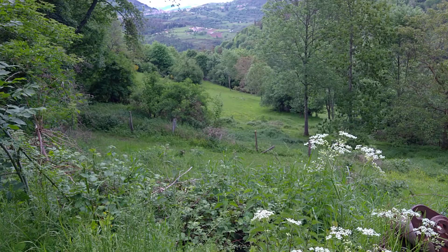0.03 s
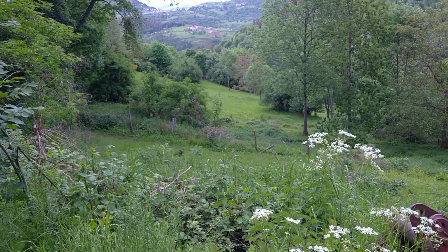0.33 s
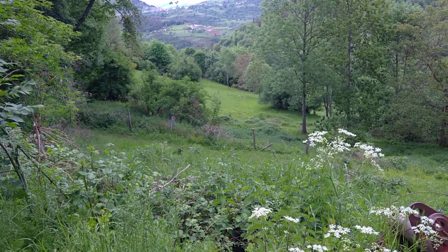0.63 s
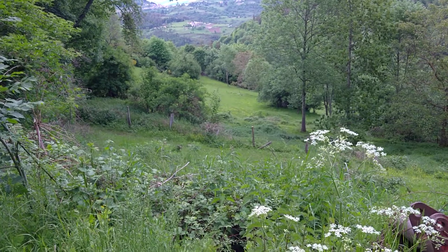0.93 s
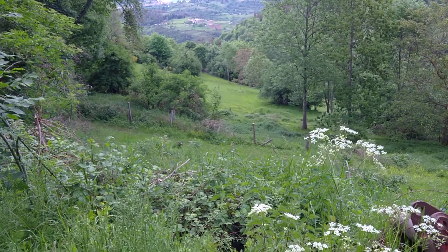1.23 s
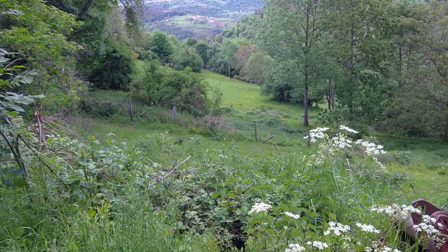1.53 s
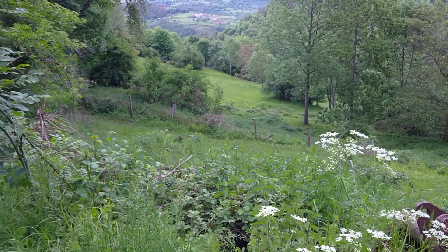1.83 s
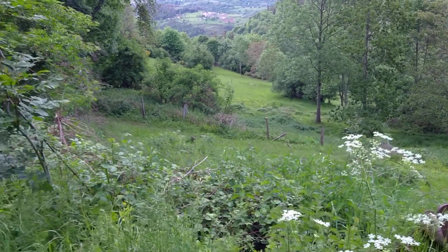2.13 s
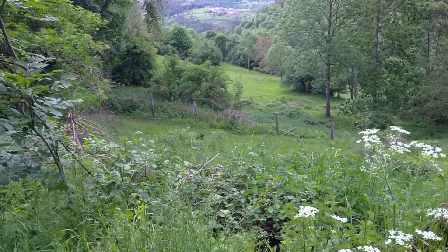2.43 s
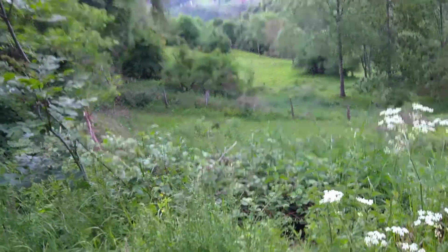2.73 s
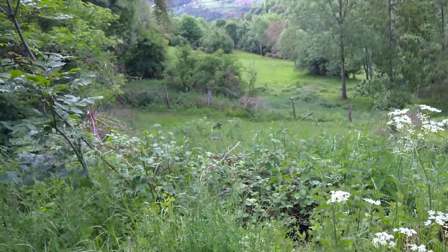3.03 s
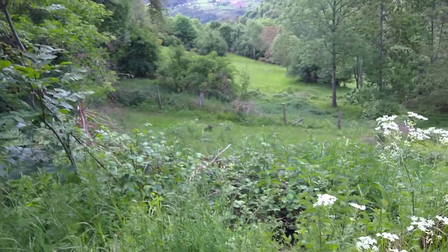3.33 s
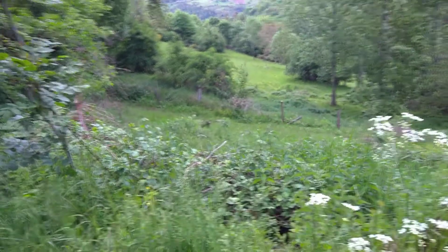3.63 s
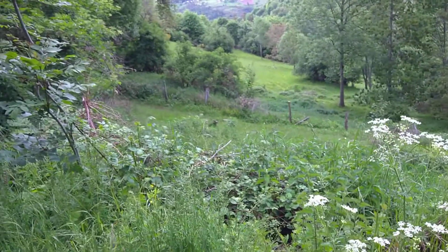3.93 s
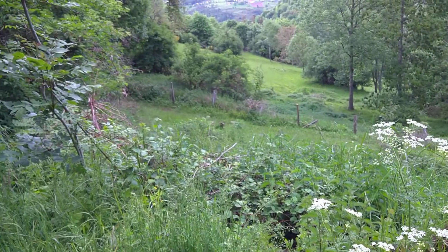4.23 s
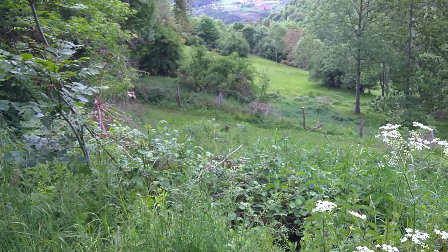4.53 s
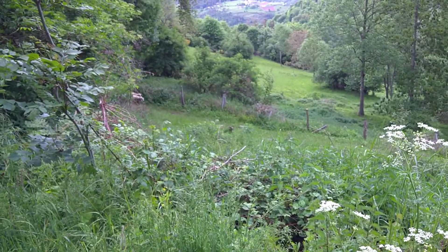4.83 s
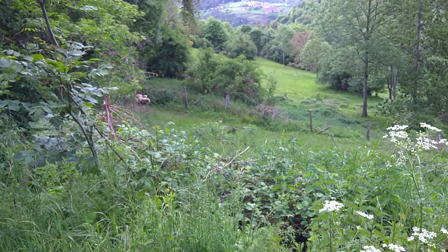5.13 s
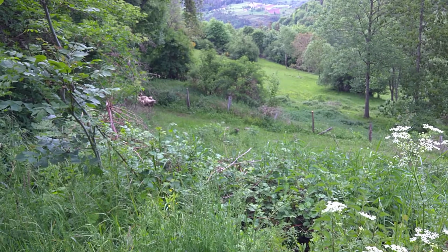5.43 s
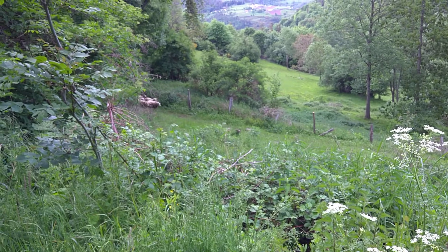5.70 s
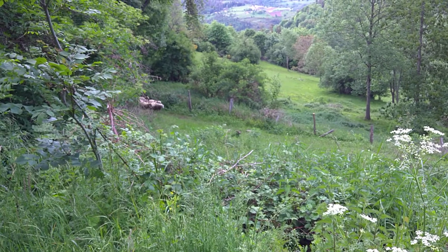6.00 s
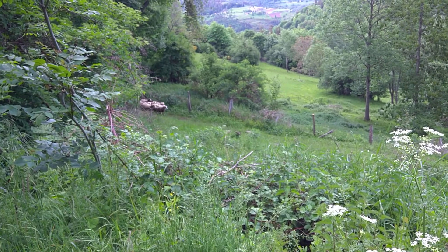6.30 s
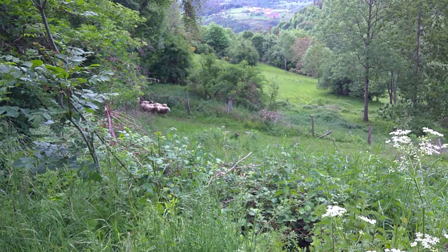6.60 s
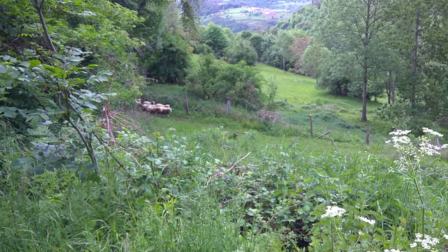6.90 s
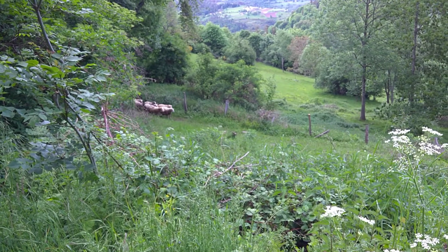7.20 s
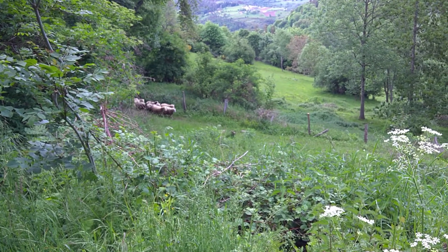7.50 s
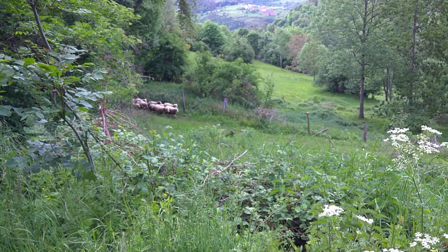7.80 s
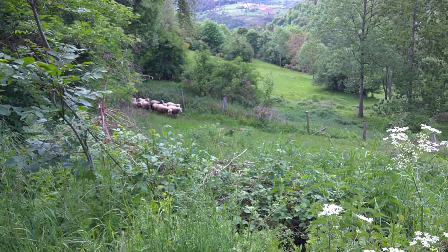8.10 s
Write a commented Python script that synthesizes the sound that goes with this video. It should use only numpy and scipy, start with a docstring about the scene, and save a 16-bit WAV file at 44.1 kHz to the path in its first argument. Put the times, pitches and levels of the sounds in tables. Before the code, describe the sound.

A low steady hum and airy outdoor rumble underlie chirping birds, faint far-off sheep bells and dull knocks from a handled camera.

```python
"""A mountain meadow fades up on a soft valley rush, leaves and a thin insect band, bright on the left,
dull on the right over a deep steady hum. A hand starts bumping the camera. From 1 s clappers tinkle and
clank in the bells of far-off sheep, and songbirds join from the trees with whistles and upslurred calls.
The hardest bump lands near 2.7 s. Past 4 s come firmer clanks and a run of plunging bird notes, then
dry ticks in the undergrowth; a sinking trill at 7.2 s leads into a last flurry of rasps and whistles."""
import sys
import numpy as np
from scipy import signal
from scipy.fft import rfft, irfft, next_fast_len
from scipy.io import wavfile
from scipy.ndimage import uniform_filter1d, map_coordinates

SR = 44100
rng = np.random.default_rng(int(sys.argv[2]) if len(sys.argv) > 2 else 0)


def inscribe(sig):
    """Save sig as 16-bit PCM at rate SR to the path in sys.argv[1].

    A 1-D sig is mono; a 2-D sig holds one channel per row.
    Samples are clipped to [-1, 1] before scaling.
    """
    pcm = np.round(np.clip(np.atleast_2d(sig).T, -1, 1) * 32767)
    wavfile.write(sys.argv[1], SR, pcm.astype(np.int16))


N = 359415
TIME = np.arange(N) / SR

# hard strokes that ring mainly one long note: the sheep bells near 1.2 kHz, and at 2.22 s a long 6170 Hz mode
# of a small bell: (time [s], pitch [Hz], relative level [dB])
CLANKS = [(2.22, 6170, -58), (4.01, 1183, -61.5), (4.915, 1166, -59.5), (6.5, 1177, -65.5)]
# a sheep walks and its bell sounds softly: (start [s], end [s], pitch [Hz], relative level [dB])
SHEEP_WALKS = [(1.25, 2.5, 1177, -75), (1.86, 3.0, 5380, -72), (7.36, 8.1, 1177, -73)]
# second mode of the one-note bells: (frequency [multiple of the note], relative level [dB])
BELL_OVERTONE = (2.32, -21.5)
# clear shakes of the small bells: (time [s], relative level [dB], tilt [dB/octave])
TINKLES = [(.97, -71.5, 3), (1.226, -64, 5), (1.798, -66.5, 3), (2.219, -66.5, -1.5), (2.441, -66, -2),
           (2.97, -66.5, -2), (4.009, -66, -4), (4.394, -58.5, -1), (6.6, -69, -2)]
# modes of the small bells: (frequency [Hz], relative level [dB])
SMALL_BELL_MODES = [(2710, -7), (3060, -5.5), (3580, -5), (5157, 3), (5370, -9), (5790, -12), (6169, -11.5),
                    (8086, -4.5), (8220, 0), (10030, -8.5), (11149, -1.5), (11445, -6), (11660, -12),
                    (13000, -9), (14150, -10.5), (14650, -10), (15600, -18)]

# whistled notes: (time [s], length [s], middle pitch [Hz], relative level [dB], slur, perch)
WHISTLES = [(1.49, 0.19, 2198, -66.5, "level", "right"), (1.817, .1, 2020, -68.5, "scoop", "right"),
            (1.911, 0.079, 1870, -59.5, "sag", "right"), (2.017, 0.079, 8100, -64, "level", "near"),
            (2.117, 0.052, 2316, -59.5, "sag", "right"), (2.173, 0.091, 2065, -59, "rise", "ahead"),
            (2.68, 0.183, 2185, -61, "level", "ahead"), (2.921, 0.19, 2040, -59, "scoop", "left"),
            (3.031, 0.13, 1914, -54, "dip", "left"), (3.147, .11, 2090, -59.5, "rise", "left"),
            (4.327, 0.3, 2127, -65, "level", "left"), (4.87, .06, 1955, -64.5, "fall", "left"),
            (5.044, 0.2, 2135, -59.5, "sag", "left"), (5.32, .06, 2055, -66, "fall", "left"),
            (5.65, 0.13, 1855, -69, "arch", "ahead"), (5.939, .16, 2694, -65, "sag", "left"),
            (6.19, .12, 2220, -58, "arch", "left"), (6.284, .125, 2000, -60.5, "dip", "left"),
            (7.486, 0.145, 2255, -53.5, "level", "left"), (7.738, 0.069, 5580, -48, "level", "near"),
            (7.757, 0.097, 2440, -59.5, "sag", "left"), (7.835, 0.087, 6810, -50, "level", "near"),
            (7.861, 0.059, 2100, -60.5, "fall", "left"), (7.877, 0.044, 5560, -50.5, "level", "near"),
            (7.913, 0.11, 6950, -58.5, "level", "near"), (7.932, .042, 2080, -60.5, "fall", "left"),
            (8.036, 0.14, 1773, -49, "scoop", "left")]
# how a whistle bends, by slur: (start pitch [share of middle pitch], end pitch [share of middle pitch])
SLURS = {"level": (0.95, 0.95), "rise": (.91, 1.09), "scoop": (.88, 1.025), "fall": (1.08, 0.886),
         "sag": (1.06, 0.94), "arch": (.91, .92), "dip": (1.06, 1.08)}
# where a whistling bird sits, by perch: (pan left [dB], echo level [dB], echo t60 [s])
PERCHES = {"near": (27, -2.5, 0.33), "left": (18.8, -3, 0.6), "ahead": (6.5, 1, 0.56), "right": (-9, 0, .6)}
# upslurred "hweet" calls: (time [s], top pitch [Hz], relative level [dB])
HWEETS = [(2.265, 4190, -47), (2.51, 4140, -49.5), (4.8, 4125, -49.5), (5.07, 4060, -52.5),
          (6.665, 4160, -52.5), (6.915, 4120, -55.5), (7.05, 3204, -61), (7.565, 4160, -51)]
# the upslur: (position [share of the call], pitch [share of top pitch])
HWEET_SHAPE = [(0, .78), (0.161, 0.918), (.3, 0.98), (.6, 1), (1, 0.94)]
# calls that arch and plunge: (time [s], top pitch [Hz], relative level [dB])
ARCHES = [(4.48, 4130, -63), (4.552, 4470, -50.5), (4.688, 4720, -47.5), (4.824, 4690, -52.5),
          (4.93, 4630, -53.5)]
# the arch: (position [share of the call], pitch [share of top pitch])
ARCH_SHAPE = [(0, .86), (.3, .94), (.56, 1), (.68, .94), (.82, .77), (1, 0.49)]
# rasping notes:
# (time [s], length [s], start pitch [Hz], end pitch [Hz], swing [Hz], relative level [dB], pan left [dB])
RASPS = [(1.894, 0.077, 2586, 3270, 700, -61.5, 2), (2.476, 0.14, 2574, 2240, 220, -58.5, 12),
         (2.527, 0.045, 3190, 3130, 40, -59.5, 10), (2.668, 0.061, 2350, 2346, 300, -55, 3),
         (7.617, 0.119, 3547, 3706, 297, -47.5, 23), (8.053, 0.071, 5540, 5280, 334, -44.5, 24)]

# hand bumps on the camera body: (time [s], level [dB], rough pitch [Hz])
BUMPS = [(.551, -27.5, 280), (.982, -33.5, 220), (1.538, -40.5, 240), (1.587, -25, 298),
         (1.601, -25.5, 220), (1.63, -24.5, 189), (1.642, -32.5, 775), (1.666, -37, 880), (2.178, -32, 257),
         (2.312, -33, 223), (2.582, -29, 191), (2.642, -28.5, 292), (2.663, -5.5, 291), (3.113, -33.5, 292),
         (3.193, -27.5, 213), (3.232, -26.5, 243), (3.316, -27.5, 228), (3.344, -27, 213),
         (3.393, -33, 210), (3.428, -26.5, 216), (4.711, -23.5, 304), (7.73, -33.5, 296)]
# sharp handling clicks: (time [s], level [dB], pitch [Hz], pan left [dB])
CLICKS = [(3.238, -35, 1000, 11), (4.727, -33, 2000, 18), (5.424, -23.5, 1490, -33)]
# the grip shifts, its rub building and letting go: (peak time [s], level [dB])
GRIP_SHIFTS = [(1.62, -44), (2.62, -42), (3.33, -41.5)]
# dry ticks in the undergrowth: (time [s], relative level [dB])
TICKS = [(6.3, -53.5), (6.335, -54), (6.43, -54), (6.511, -56), (6.64, -50), (6.66, -55), (6.735, -60),
         (6.854, -54), (6.969, -60)]

# swells of the air bed: (time [s], relative valley level [dB], relative leaf level [dB])
AIR_SWELLS = [(0.4, -67.5, -86), (1.13, -63, -84), (1.56, -65.5, -84), (2.18, -62.5, -79),
              (3.08, -64, -81.5), (3.4, -63, -80.5), (4.19, -64.5, -84), (4.52, -63.5, -80),
              (5.7, -67, -81), (7.78, -67, -77.5), (8.1, -66, -76.5)]
# valley rush, bright side: (frequency [Hz], relative density [dB])
RUSH_LEFT = [(15, -4), (45, -1), (100, -13), (280, -12), (550, -19.5), (1100, -23.5), (3500, -28.5),
             (6000, -30.5), (16000, -61.5)]
# valley rush, dull side: (frequency [Hz], relative density [dB])
RUSH_RIGHT = [(20, 2), (70, 7), (120, 0), (220, -6), (450, -5.5), (700, -7), (1000, -15), (1500, -25.5),
              (3000, -41.5), (6000, -47.5), (16000, -73.5)]
# rustle of leaves: (frequency [Hz], relative density [dB])
LEAF_SPECTRUM = [(1000, -30), (3500, 1.5), (5500, 2), (7000, -3), (9000, -2), (12000, -7.5), (15500, -16.5)]
# thin band of insects: (frequency [Hz], relative density [dB])
INSECT_SPECTRUM = [(3000, -54.5), (3900, -20.5), (4350, -4.5), (4620, -1.5), (4900, -15), (5600, -30.5)]
# faint hiss on the right: (frequency [Hz], relative density [dB])
HISS_SPECTRUM = [(300, -4.5), (1300, -0.5), (3000, -4), (4300, -11.5), (5000, -12.5), (7000, -13),
                 (8500, -21.5), (16000, -22.5)]


def sheep_bells(t60=0.46, rattle_s=0.14, step_s=0.24, reference_hz=1177):
    """One-note bells: a soft stroke at each step of a sheep, and a few hard ones, one of them drawing a long
    high note from a small bell. Small ones die sooner."""
    out = np.zeros((2, N))
    steps = [(s + 0.03 * rng.normal(), hz, db + 2 * rng.normal())
             for first, last, hz, db in SHEEP_WALKS for s in np.arange(first, last, step_s)]
    overtone_ratio, overtone_db = BELL_OVERTONE
    for s, hz, db in CLANKS + steps:
        size = (reference_hz / hz) ** 0.35
        modes = [(hz, 0), (hz * overtone_ratio, overtone_db)]
        clank = clapper(modes, tilt_db=1, t60=t60 * size, attack_s=0.014,
                        rattle_s=rattle_s * size, scrape_db=-14.5)
        pan_db = 1 + 10.5 * np.log2(hz / reference_hz)  # the dull right side loses the high notes
        add(out, s, amp(db + 4.5) * clank, pan_db)
    return out


def small_bells(jingles=6, jingle_db=-74.5, jingle_tilt_db=-6):
    """Sheet-metal bells shake on the sheep's necks; the clapper lands on a new spot each time."""
    out = np.zeros((2, N))
    spread = (np.arange(jingles) + rng.random(jingles)) / jingles
    faint_shakes = [(s, jingle_db, jingle_tilt_db) for s in 1 + spread * (N / SR - 1)]
    for s, db, tilt_db in TINKLES + faint_shakes:
        modes = [(hz, level + 2 * rng.normal()) for hz, level in SMALL_BELL_MODES]
        tinkle = clapper(modes, tilt_db, t60=0.18, attack_s=0.006, rattle_s=0.065, scrape_db=-5)
        add(out, s, amp(db + 1) * among_trees(tinkle, wet_db=-9, t60=0.72), pan_db=23.5)
    return out


def clapper(modes, tilt_db, t60, attack_s, rattle_s, scrape_db):
    """A clapper strikes, then rattles and scrapes along the wall, feeding the modes at each contact."""
    t = np.arange(SR // 2) / SR
    hz, db = np.transpose(modes)[:, :, None]
    ringing = np.sin(2 * np.pi * hz * t) * amp(-60 * t / t60) * (1 - np.exp(-t / attack_s))
    scrape = np.array([wobble(0.07 * f, size=len(t)) for f in hz[:, 0]])  # high modes blur most
    ringing *= 1 + amp(scrape_db) * scrape
    rattled = ringing.copy()
    for delay in rng.uniform(0, min(rattle_s, 0.3), size=4):
        lag = int(delay * SR)
        rattled[:, lag:] += amp(-4.5) * ringing[:, :len(t) - lag]
    rattled /= np.abs(rattled).max(axis=1, keepdims=True)
    octaves = np.log2(hz / np.median(hz))
    return np.sum(rattled * amp(db + tilt_db * octaves), axis=0)


def whistles():
    """Songbirds whistle gently bent notes; the perch sets the pan and the echo."""
    out = np.zeros((2, N))
    for s, length, pitch_hz, db, slur, perch in WHISTLES:
        start, end = SLURS[slur]
        pan_db, wet_db, t60 = PERCHES[perch]
        bend = np.polyfit([0, 0.5, 1], [start, 1, end], 2)
        note = sing(pitch_hz * np.polyval(bend, progress(length)), waver=0.0078, shimmer_db=0.5)
        add(out, s, amp(db) * among_trees(note, wet_db, t60), pan_db)
    return out


def bird_calls(rows, shape, length, wet_db, t60, pan_db, focus_db):
    """A bird repeats one pitch gesture, its voice focus_db weaker per octave below the top."""
    out = np.zeros((2, N))
    contour = curves(shape, progress(length))[0]
    for s, top_hz, db in rows:
        note = unit(sing(top_hz * contour, waver=0.0084) * amp(focus_db * np.log2(contour)))
        add(out, s, amp(db) * among_trees(note, wet_db, t60), pan_db)
    return out


def rasps(flutter_hz=135):
    """A fast flutter of pitch roughens a bird's note into a rasp."""
    out = np.zeros((2, N))
    for s, length, start_hz, end_hz, swing_hz, db, pan_db in RASPS:
        along = progress(length)
        glide_hz = start_hz + (end_hz - start_hz) * along
        flutter = np.sin(2 * np.pi * flutter_hz * length * along + 1.9 * wobble(61.5, size=len(along)))
        note = sing(glide_hz + swing_hz * flutter)
        add(out, s, amp(db) * among_trees(note, wet_db=3.5, t60=0.41), pan_db)
    return out


def trill(start_s=7.181, length=0.32, period_s=0.0145, top_hz=5135, drop_octaves=0.82, sweep=0.164):
    """A bird's run of quick, uneven downward flicks swells, then fades as it sinks ever faster."""
    out = np.zeros((2, N))
    downsweep = sweep * (1 - 2 * progress(length=0.0103))
    for age in np.arange(0, length, period_s):
        s = start_s + age
        hz = top_hz * 2 ** (-drop_octaves * (age / length) ** 1.87)
        db = -49.5 + swell(s, peak_s=7.3, rise_db_per_s=141, fall_db_per_s=75)
        flick = sing(hz * (1 + 0.041 * rng.normal() + downsweep))
        onset = s + 0.0015 * rng.normal()
        gain = amp(db + 2.6 * rng.normal())
        add(out, onset, gain * among_trees(flick, wet_db=-3.5, t60=0.78), pan_db=24)
    return out


def sing(hz, waver=0.0038, shimmer_db=2.0):
    """A bird's pure tone, slightly unsteady in pitch and strength, swelling and fading."""
    size = len(hz)
    phase = 2 * np.pi * np.cumsum(hz * (1 + waver * wobble(153.6, size))) / SR
    shimmer = amp(shimmer_db * wobble(60.5, size))
    return unit(np.sin(phase) * signal.windows.tukey(size, 0.6) * shimmer)


def handling():
    """A hand on the camera: soft bumps with a low thud and a scuff of skin, clicks, a rubbing grip."""
    out = np.zeros((2, N))
    lead_s = 0.04  # puts the middle of each knock on its cue
    for s, db, hz in BUMPS:
        body = knock(1.03 * hz, cycles=max(0.42, hz * 0.00156))
        thud = amp(-13) * knock(0.38 * hz, cycles=0.41)
        scuff = amp(min(db, -26) - 13) * wobble(1505, size=len(body)) * np.hanning(len(body)) ** 20
        add(out, s - lead_s, amp(db) * (body + thud) + scuff, pan_db=-46)
    for s, db, hz, pan_db in CLICKS:
        add(out, s - lead_s, amp(db) * knock(hz, cycles=0.057), pan_db)
    out[1] += grip_rub()
    return out


def grip_rub(rest_db=-60.5):
    """A low rub of skin, faint while the hand holds still, swelling as it shifts."""
    spectrum = [(30, -9.5), (80, 4), (160, -4), (450, -14.5), (1000, -31), (4000, -72.5)]
    rub = unit(amp(4.5 * wobble(45)) * patchy_noise(spectrum, patchy_db=3))
    shifts = sum(amp(db + swell(TIME, s, rise_db_per_s=80, fall_db_per_s=63)) for s, db in GRIP_SHIFTS)
    return np.hypot(amp(rest_db), shifts) * rub


def knock(hz, cycles):
    """A dead knock with no ring: a swing or two at most, centred 40 ms in."""
    t = np.arange(-SR // 25, SR // 25) / SR
    return np.cos(2 * np.pi * hz * t + rng.uniform(0.84, 1.1)) * np.exp(-0.5 * (t * hz / cycles) ** 2)


def ticks(lead_s=0.04):
    """Small dry ticks scattered by the undergrowth."""
    out = np.zeros((2, N))
    for s, db in TICKS:
        tick = among_trees(knock(hz=5550, cycles=0.6), wet_db=7, t60=0.089)
        add(out, s - lead_s, amp(db + 14) * tick, pan_db=25)
    return out


def far_chorus(floor_db=-75.1, count=60):
    """Many birds farther up the valley: faint slurs, heard mostly through their echo."""
    out = np.zeros((2, N))
    for when, height, bend, length, strength in rng.random((count, 5)):
        octaves = 1.1 * height + 0.5 * (bend - 0.5) * progress(0.03 + 0.053 * length)
        note = among_trees(sing(1750 * 2 ** octaves, waver=0.015), wet_db=2.5, t60=0.35)
        add(out, when * N / SR, amp(floor_db + 3.8 * strength) * note, pan_db=14)
    return out


def air(brush_s=3.495, brush_width_s=0.15):
    """The valley's rush, with leaves and insects on the left, hiss on the right, and a sleeve's brushing swish
    near 3.5 s."""
    valley_db, rustle_db = curves(AIR_SWELLS)
    leaves = amp(rustle_db + 7.5 + 0.87 * wobble(25)) * patchy_noise(LEAF_SPECTRUM, patchy_db=2)
    swish = np.exp(-0.5 * ((TIME - brush_s) / brush_width_s) ** 2)
    brush = swish * amp(-65.5 + 1.2 * wobble(60)) * patchy_noise(LEAF_SPECTRUM, patchy_db=1.2)
    insect_db = -68 + 0.6 * wobble(3.36) + 1.3 * wobble(35)
    insects = amp(insect_db) * patchy_noise(INSECT_SPECTRUM, patchy_db=1.5)
    rush_left = amp(0.4 * valley_db - 37) * patchy_noise(RUSH_LEFT, patchy_db=3)
    rush_right = amp(valley_db + 14) * patchy_noise(RUSH_RIGHT, patchy_db=2)
    hiss = amp(-68.5) * patchy_noise(HISS_SPECTRUM, patchy_db=2)
    return np.array([rush_left + leaves + brush + insects, rush_right + hiss])


def hum(hum_hz=40.09, hum_db=-23.5, pulse_hz=30, whirr_hz=590, width_hz=300, whirr_db=-66.5):
    """On the right: a deep, pure, steady hum and a faint whirr of quick pulses in a small resonance."""
    tone = unit(np.sin(2 * np.pi * hum_hz * TIME))
    pulses = np.diff(np.floor(pulse_hz * TIME), prepend=0)
    whirr = filtered(pulses, lambda f: (1j * f / (whirr_hz ** 2 - f ** 2 + 1j * f * width_hz)) ** 2)
    return np.array([np.zeros(N), amp(hum_db) * tone + amp(whirr_db) * unit(whirr)])


def among_trees(x, wet_db, t60):
    """A sound followed by its scatter from trunks and foliage, different at each ear."""
    t = np.arange(SR // 2) / SR
    tail = rng.standard_normal((2, len(t))) * amp(-60 * t / t60) * (1 - np.exp(-t / 0.01))
    tail *= amp(wet_db) / np.linalg.norm(tail[0])
    tail[:, 0] = 1  # the direct sound
    return signal.fftconvolve(x[None], tail, axes=1) / np.hypot(1, amp(wet_db))


def patchy_noise(spectrum, patchy_db):
    """Noise of rms 1 with patches of random gain, coloured by (frequency [Hz], relative density [dB])."""
    bins = signal.stft(rng.standard_normal(N), nperseg=512)[2]
    patches = uniform_filter1d(rng.standard_normal(bins.shape), size=4, axis=0)
    patches = uniform_filter1d(patches, size=12, axis=1)
    noise = signal.istft(bins * amp(patchy_db * unit(patches)), nperseg=512)[1][:N]
    hz, db = np.transpose(spectrum)
    return unit(filtered(noise, lambda f: amp(np.interp(np.log(f + 1), np.log(hz), db))))


def amp(db):
    """Decibels to gain."""
    return 10 ** (np.asarray(db) / 20)


def unit(x):
    """Scale to rms 1."""
    return x / np.sqrt(np.mean(x ** 2) + 1e-20)


def curves(rows, at=TIME):
    """Breakpoint envelopes: each column after the first, joined by straight lines."""
    knots, *columns = np.transpose(rows)
    return [np.interp(at, knots, column) for column in columns]


def swell(t, peak_s, rise_db_per_s, fall_db_per_s):
    """A steady ramp up to 0 dB and back down."""
    return np.minimum(rise_db_per_s * (t - peak_s), fall_db_per_s * (peak_s - t))


def progress(length):
    """0 to 1 over a note, its length in seconds."""
    return np.linspace(0, 1, max(int(length * SR), 16))


def wobble(rate, size=N):
    """A smooth random curve, rate knots a second."""
    knots = rng.standard_normal(int(size * rate / SR) + 4)
    return map_coordinates(knots, [np.arange(size) * rate / SR + 1])


def filtered(x, response):
    """EQ a sound with a gain given as a function of frequency."""
    size = next_fast_len(N + 8192)
    return irfft(rfft(x, size) * response(np.fft.rfftfreq(size, 1 / SR)), size)[..., :N]


def add(out, s, sound, pan_db):
    """Mix a sound in at time s, pan_db louder on the left than on the right."""
    start = max(round(s * SR), 0)
    gains = amp([[pan_db / 2], [-pan_db / 2]])
    part = (sound * gains / np.linalg.norm(gains))[:, :max(N - start, 0)]
    out[:, start:start + part.shape[1]] += part


def scene():
    """Birds and bells over the air bed, with handling noise and hum."""
    birds = whistles() + rasps() + trill()
    birds += bird_calls(HWEETS, HWEET_SHAPE, length=0.08, wet_db=0, t60=0.3, pan_db=24.5, focus_db=18)
    birds += bird_calls(ARCHES, ARCH_SHAPE, length=0.062, wet_db=-7, t60=0.95, pan_db=28, focus_db=3)
    meadow = amp(-2) * birds + far_chorus() + small_bells() + sheep_bells() + ticks() + air()
    return meadow + handling() + hum()


def record(dry, start_s=0.075, settle_s=0.09, top_hz=15750):
    """The mix fades up softly; nothing passes above top_hz."""
    fade = (1 - np.exp(-np.maximum(TIME - start_s, 0) / settle_s)) ** 2
    return filtered(dry * fade, lambda hz: hz < top_hz)


dry = scene()
out = record(dry)
inscribe(out)
```